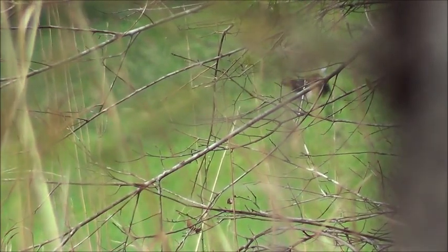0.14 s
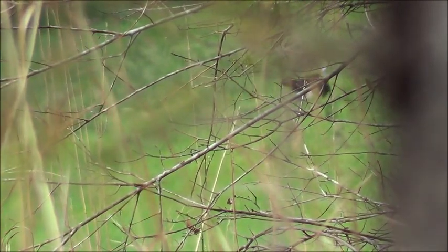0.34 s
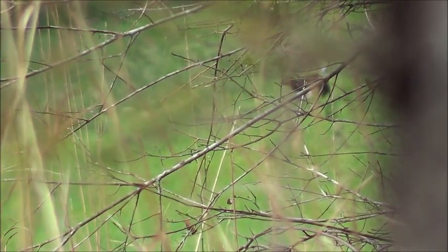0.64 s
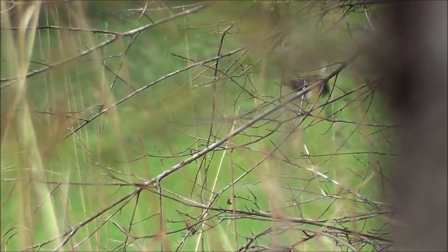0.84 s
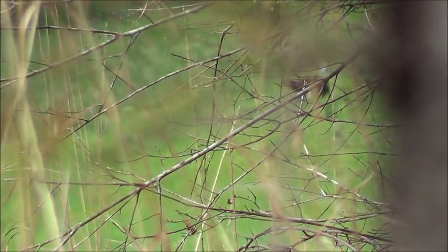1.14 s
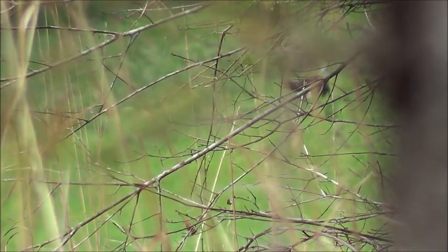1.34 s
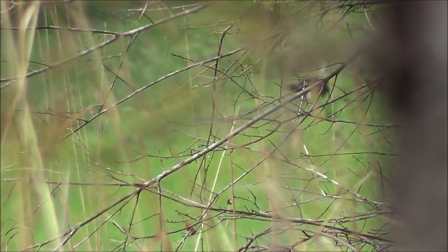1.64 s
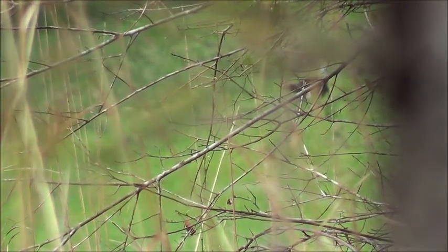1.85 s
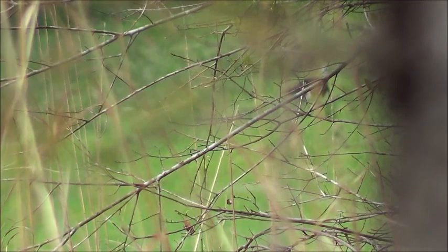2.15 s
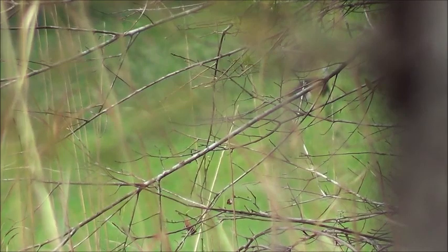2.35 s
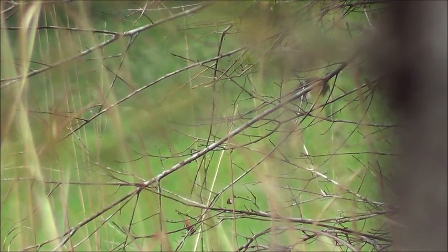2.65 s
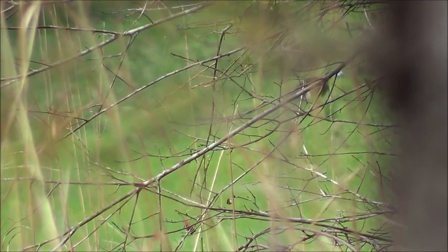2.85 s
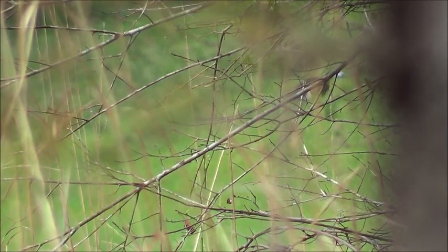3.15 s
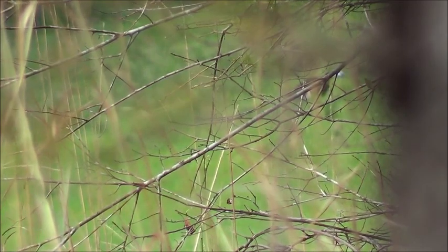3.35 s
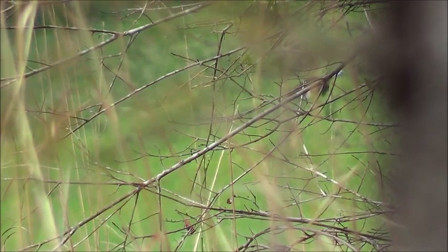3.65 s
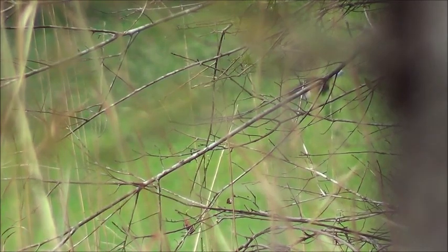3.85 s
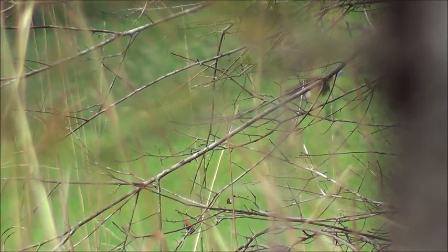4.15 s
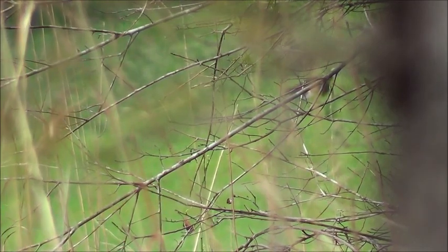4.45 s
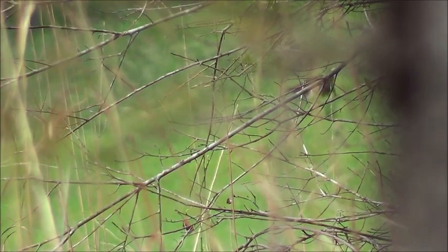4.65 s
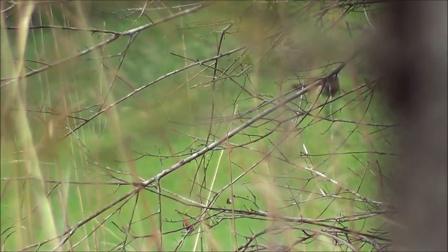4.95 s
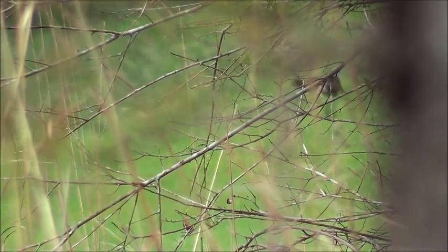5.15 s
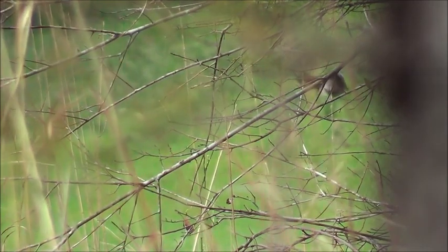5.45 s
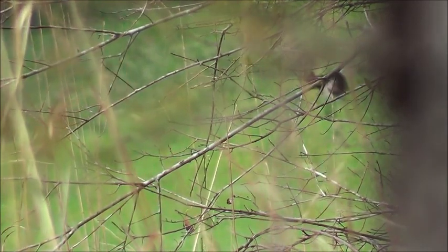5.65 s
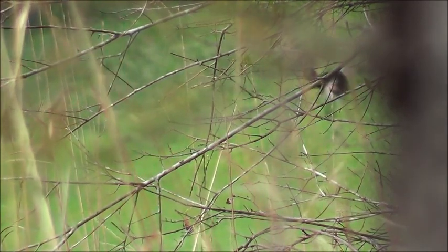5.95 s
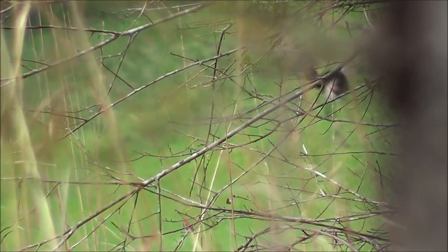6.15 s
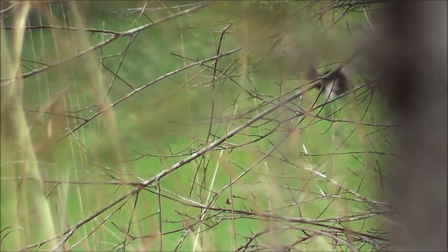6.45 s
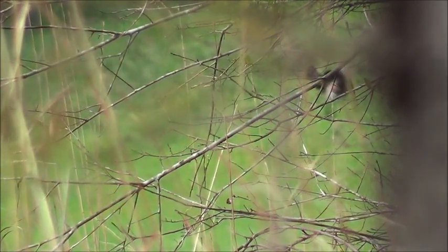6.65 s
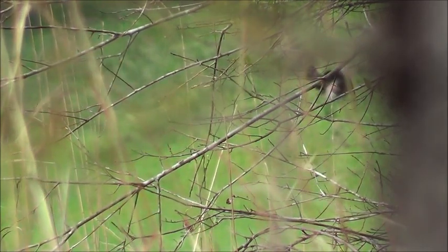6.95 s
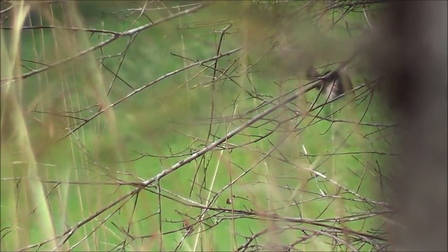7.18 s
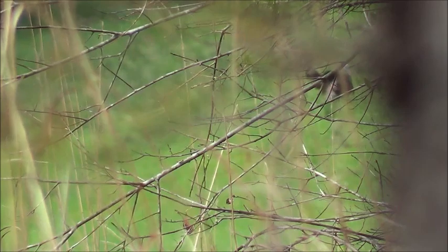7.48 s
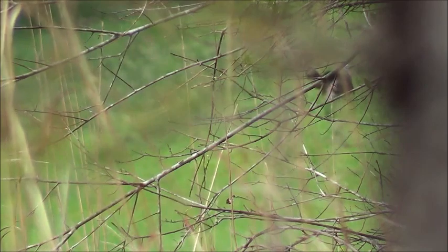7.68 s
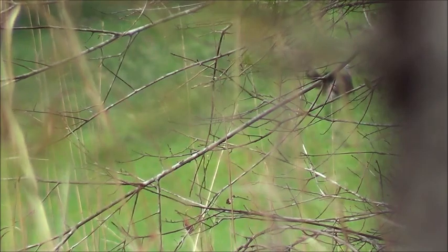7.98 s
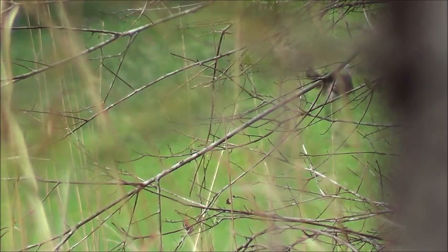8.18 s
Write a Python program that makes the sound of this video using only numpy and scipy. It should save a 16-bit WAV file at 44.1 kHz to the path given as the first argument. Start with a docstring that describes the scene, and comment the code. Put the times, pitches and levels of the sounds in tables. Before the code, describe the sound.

A turkey close by on the left gives nine loud raspy yelps, a short purr and five clucks in quiet woodland.

```python
"""Quiet woodland, a turkey close by and left of a camera's stereo microphone. Over air, hiss and scan whine
it opens with nine yelps, each a raspy reed tone that slides up as the membrane tightens and slips back,
many times over. Far trees answer faintly. From 3.5 s a few twigs tick; near 5 s comes a short purr, and
from 6 s five clucks. The camera's gain control ducks hiss and whine under each call and recovers slowly."""
import sys
import numpy as np
from scipy import signal
from scipy.fft import rfft, irfft, next_fast_len
from scipy.io import wavfile
from scipy.ndimage import uniform_filter1d, minimum_filter1d

SR = 44100
rng = np.random.default_rng(int(sys.argv[2]) if len(sys.argv) > 2 else 0)


def store_wav(level_fs):
    """Save 16-bit WAV to argv[1]."""
    pcm = np.round(np.clip(np.atleast_2d(level_fs), -1, 1) * 32767)
    wavfile.write(sys.argv[1], SR, pcm.T.astype(np.int16))


N = 366912


def amp(db):
    return 10 ** (np.asarray(db) / 20)


def unit_rms(x):
    return x / np.sqrt(np.mean(x ** 2) + 1e-20)


def curve(points, hz):
    """Read (Hz, value) points on a log frequency axis."""
    freqs, values = np.transpose(points)
    return np.interp(np.log(hz + 1), np.log(freqs + 1), values)


def filtered(x, response):
    """Pass x through a complex response of frequency."""
    size = next_fast_len(N + SR // 2)
    return irfft(rfft(x, size) * response(np.fft.rfftfreq(size, 1 / SR)), size)[..., :N]


def minimum_phase(points, hz):
    """Response through (Hz, dB) points whose resonances ring after their cause."""
    cepstrum = irfft(np.log(amp(curve(points, hz))))
    cepstrum[1:len(hz)] *= 2
    cepstrum[len(hz):] = 0
    return np.exp(rfft(cepstrum))


def resonances(rows, hz):
    """Response of (centre Hz, width Hz, dB) resonators, summed with alternating sign."""
    return sum((-1) ** k * amp(db) * 1j * hz * width / (centre ** 2 - hz ** 2 + 1j * hz * width)
               for k, (centre, width, db) in enumerate(rows))


def patchy_noise(depth_db):
    """Two noises sharing patches of random gain in time and frequency."""
    spectra = signal.stft(rng.standard_normal((2, N)), nperseg=512)[2]
    patches = uniform_filter1d(uniform_filter1d(rng.standard_normal(spectra.shape[1:]), 6, 0), 14, 1)
    return signal.istft(spectra * amp(depth_db * unit_rms(patches)), nperseg=512)[1][:, :N]


# Woodland air and camera hiss. Each row: frequency in Hz, relative density in dB.
AIR_SPECTRUM = [(15, -53), (25, -23), (131, -10.5), (172, -12.5), (318, -2.5), (354, -1), (475, -1.5),
                (729, -2), (879, -3), (1240, -7.5), (1670, -8), (2240, -8), (3090, -8), (5880, -11.5),
                (15000, -13.5)]
# The air across the microphone. Each row: frequency in Hz, left-right correlation.
AIR_CORRELATION = [(60, 0.7), (130, 0.77), (290, 0.5), (640, 0.62), (1410, 0.76), (3100, 0.22), (6820, 0.5),
                   (15000, 0.93)]


def air(level_db=-49, insect_hz=3120):
    """A steady rush all round the microphone, with a faint band of far insects."""
    def mid_side(hz):
        insects_db = 5.2 * np.exp(-((hz - insect_hz) / 90) ** 2)
        colour = amp(curve(AIR_SPECTRUM + [(15750, -8.5), (15830, -68)], hz) + insects_db)
        angle = np.arccos(np.clip(curve(AIR_CORRELATION, hz), -1, 1)) / 2
        return colour * [np.cos(angle), np.sin(angle)]
    mid, side = filtered(patchy_noise(depth_db=1.06), mid_side)
    return amp(level_db) * unit_rms(np.array([mid + side, mid - side]))


def scan_whine(line_hz=15734.27, beat_hz=13.0, field_hz=59.94):
    """The camera's own scan tone beats with a near neighbour and has sidebands at the field rate."""
    t = np.arange(N) / SR
    line = np.sin(2 * np.pi * line_hz * t)
    neighbour = amp(-5.5) * np.sin(2 * np.pi * (line_hz * t + beat_hz * (t - .037)))
    sidebands = sum(amp(-15.5 - 1.1 * k) * np.sin(2 * np.pi * (line_hz - k * field_hz) * t)
                    for k in range(1, 9))
    lower_tone = amp(-75.5) * np.sin(2 * np.pi * 7433 * t)
    return amp(-51) * (line - neighbour + sidebands) + lower_tone


# Twigs around the microphone. Each row: start in seconds, level in dB, pitch in Hz.
TWIG_TICKS = [(3.5148, -34, 8710), (4.8544, -45, 7100), (5.1517, -26.5, 4240), (5.7873, -35, 3930),
              (7.103, -38.5, 4020), (7.1721, -50, 3084)]


def twigs(t60_s=0.0074):
    """Dry ticks, each a quickly dying tone in broad noise."""
    out, t = np.zeros((2, N + SR)), np.arange(400) / SR
    for start, db, hz in TWIG_TICKS:
        click = np.sin(2 * np.pi * hz * t) + .7 * rng.standard_normal((2, len(t)))
        out[:, round(start * SR):][:, :len(t)] += click * amp(db - 60 * t / t60_s)
    return out[:, :N]


# Far trunks, then nearer trunks and brush. Each row: frequency in Hz, seconds to die away by 60 dB.
FAR_TREE_DECAY = [(300, .6), (700, 0.38), (1020, 3.1), (1400, 1.5), (2000, .7), (5000, 0.31)]
NEAR_BRUSH_DECAY = [(300, 0.16), (1000, 0.45), (5000, 0.04)]


def woodland_echo(voice, decays, delay_s):
    """Trunks scatter the voice back to the microphone; each frequency dies at its own speed."""
    hz, t, spectra = signal.stft(rng.standard_normal((2, 2 * SR)), SR, nperseg=256)
    tail = signal.istft(spectra * amp(-60 * t / curve(decays, hz)[:, None]), SR, nperseg=256)[1]
    delayed = np.pad(voice, (round(delay_s * SR), 0))
    return signal.fftconvolve(delayed[None], tail / np.linalg.norm(tail[0]), axes=1)[:, :N]


# The bird's bearing at the microphone. Each row: frequency in Hz, left over right in dB.
LEFT_LOUDER = [(100, 10), (700, 2), (1300, 3.5), (2400, 6), (4400, 0.5), (8000, 8), (15000, -6)]
# Each row: frequency in Hz, phase lead of the left port in radians.
LEFT_LEAD = [(100, 0.086), (500, 1), (1100, 0.86), (2500, 0.9), (4500, 1), (7000, .4), (9000, -1.3),
             (12000, -0.011)]


def direct_path(voice, gain_db=4.18):
    """Straight from the bird, the voice reaches the left port earlier and louder."""
    def port(hz, side):
        gain = amp(side * curve(LEFT_LOUDER, hz) / 2 + gain_db)
        return gain * np.exp(.5j * side * curve(LEFT_LEAD, hz))
    return filtered(voice, lambda hz: np.array([port(hz, 1), port(hz, -1)]))


FULL_CALL_S = 0.13  # shorter calls arch less in octave and rasp, and swell less


def effort_db(t, length, release, first_slip):
    """A call builds until its first slip, holds, then falls away."""
    onset = np.clip(1 - t / first_slip, 0, 1)
    ending = np.clip(1 - (length - t) / release, 0, 2)
    return -12.5 * onset ** 2 - 14.5 * ending ** 1.2


# Fixed beak resonances. Each row: centre in Hz, width in Hz, gain in dB.
BEAK_MODES = [(2439, 110, 2.5), (3400, 2300, -20), (5020, 280, -20.5), (8300, 1700, -30), (9335, 250, -12),
              (12600, 1200, -28.5)]
# The moving resonance, from beak shut to wide, in the same columns.
GAPE_MODES = [(3657, 480, -0.5), (3936, 480, -2.5), (4272, 460, -1), (4500, 310, -7.5)]


def beak(snaps, calls, arch_hz=600, tilt_hz=250):
    """Snaps ring the beak; one resonance climbs as it opens mid-call and comes part way back."""
    t, level_db, gape_hz = np.arange(N) / SR, np.full(N, -120.), np.zeros(N)
    for start, length, release, _, first_slip, *_, rasp_db, beak_hz in calls:
        on = (t >= start) & (t < start + length + .01)
        age = t[on] - start
        progress = age / length
        arch_db = min(length / FULL_CALL_S, 1) * np.interp(progress, [0, .38, 1], [-12.5, 0, -14])
        level_db[on] = rasp_db + arch_db + .8 * effort_db(age, length, release, first_slip)
        opening = np.sin(np.pi * np.minimum(progress, 1))
        centre_hz = beak_hz + tilt_hz * (progress - .5) + arch_hz * (opening - .6)
        gape_hz[on] = np.clip(centre_hz, GAPE_MODES[0][0], GAPE_MODES[-1][0])
    rasp = filtered(amp(level_db + 22.5) * snaps, lambda hz: 1 / (1 + (2000 / (hz + 1)) ** 8))
    out = filtered(rasp, lambda hz: resonances(BEAK_MODES, hz))
    for centre, width, db in GAPE_MODES:
        share = np.clip(1 - np.abs(gape_hz - centre) / 420, 0, 1)
        out += amp(db) * filtered(share * rasp, lambda hz: resonances([(centre, width, 0)], hz) ** 2)
    return out


def slip_times(length, first_slip, slide_s, slowing_s, slowest, jitter, slow_span_s=.03):
    """A call's start, the times its membrane slips back, and its end; slips thin out around `slowest`."""
    t = np.arange(round(length * SR)) / SR
    period = slide_s + slowing_s * np.exp(-((t - slowest * length) / slow_span_s) ** 2)
    count = np.cumsum(1 / period) / SR
    count -= np.interp(first_slip, t, count)
    times = np.interp(np.arange(np.ceil(count[-1])), count, t)
    return np.r_[0, np.clip(times + .0004 * jitter[:len(times)], 0, length), length]


def slide_pitch(t, span, low_hz, high_hz, opens_call, lock_s=.0065, jump_s=.001482, slackest=.75):
    """The tightening membrane climbs, jumps and locks on the top pitch. Returns Hz and lock, 0 to 1."""
    climb_s = max(span - lock_s, 0)
    climb = np.minimum(t / (climb_s + 1e-4), 1)
    locked = .5 + .5 * np.tanh((t - climb_s) / jump_s)
    slackening = 0
    if opens_call:  # a call starts taut and slackens before its first climb
        slackening = np.clip(1 - climb / slackest, 0, 1)
        climb = np.clip((climb - slackest) / (1 - slackest), 0, 1)
    rising_hz = low_hz * (1 + .2 * np.sin(np.pi / 2 * climb) + .3 * slackening)
    locked_hz = high_hz * (1 - .05 * (t - climb_s - lock_s / 2) / lock_s)  # overshoots, then sinks
    return rising_hz + (locked_hz - rising_hz) * locked, locked


def membrane_snaps(phase, noise, noise_share=.5):
    """The membrane shuts sharply once a cycle: part pulse, part puff of noise."""
    pulse = unit_rms(np.exp(40 * (np.cos(phase) - 1)))
    puff = unit_rms(np.exp(2 * np.cos(phase))) * noise
    return (1 - noise_share) * pulse + noise_share * puff


# Lowest resonances of throat and beak. Each row: frequency in Hz, gain in dB.
THROAT_RESPONSE = [(100, -43.5), (300, -23), (440, -19.5), (520, -19), (620, -8.5), (780, -8.5), (900, -8),
                   (985, -4), (1090, -1.5), (1250, 2.5), (1500, -5), (1700, -16), (1950, -19),
                   (2200, -30.5), (16000, -71.5)]
# Yelps, purr pulses and clucks, close on the left. Each row: start, length and release in seconds,
# relative level in dB, time to the first slip, slide length and its slowing in seconds, slowest point
# as a share of the call, slack and top pitch in Hz, relative octave and rasp in dB, beak resonance in Hz.
CALLS = [(-.022, 0.057, .014, 6.5, .02, .0155, 0.00069, .5, 656.9, 951.3, -10.5, -39.5, 3860),
         (0.242, .17, 0.019, 6, .0202, .0131, .0077, .56, 680, 976.3, -2.5, -33, 3950),
         (0.614, .168, 0.041, 6.5, .02, .0133, .012, .51, 700, 959, -1.5, -33.5, 3870),
         (1.006, .148, 0.016, 4, .0265, .0122, .028, .64, 690, 950, -1, -36.5, 3950),
         (1.443, .158, .06, 3, .0245, .0105, .009, .6, 650, 960, -7, -42, 3950),
         (1.828, .142, 0.012, 5, .0178, .0104, .0102, .52, 689.6, 920, -0.5, -36.5, 3910),
         (2.189, 0.15, 0.021, 4.5, .0205, .0109, .0117, .54, 698.7, 951, -3.5, -37, 3780),
         (2.563, .155, 0.028, 6.5, .0168, .0113, .0094, .49, 695.8, 977.9, -3.5, -34, 3900),
         (2.944, .153, .022, 5.5, .0204, .0123, .0103, .58, 715.3, 981.8, -1.5, -36, 3780),
         (4.829, .016, 0.0094, -31.5, .014, .014, .001, .5, 647.5, 815, -14.5, -74.5, 4500),
         (4.877, .04, 0.06, -23, .013, .013, 0.0014, .5, 700.5, 777.3, -11.5, -66, 4500),
         (4.922, .03, .01, -14.5, .022, .014, .001, .5, 650.8, 945.4, -13, -56.5, 4500),
         (4.957, .03, 0.011, 0.5, 0.017, .0133, 0.0015, 0.3, 672.8, 977.8, -21, -53.5, 4550),
         (5.006, .031, 0.02, 2, 0.015, .012, 0.00073, 0.9, 666, 945.6, -19, -57.5, 4550),
         (5.049, .034, .01, -0.5, .0181, 0.013, .001, .5, 642.8, 911, -13.5, -54, 4550),
         (5.094, .035, 0.015, 2, .0186, .014, 0.00049, 0.1, 633.8, 925.2, -10, -46.5, 4550),
         (5.143, .04, 0.025, 3.5, .0145, 0.0099, .001, 0.7, 652.2, 918.6, -8.5, -47.5, 4400),
         (5.192, .037, 0.02, 5, .018, .012, .001, 0.9, 636.7, 972.5, -24, -50.5, 4100),
         (6.14, .058, .01, 7, .0201, .015, .001, .5, 676.2, 1030, -10, -36.5, 4230),
         (6.26, .066, 0.021, 3, .0125, .012, 0.0023, .55, 724, 1127, -2.5, -44, 3780),
         (6.464, .088, 0.014, 5, .0136, .0136, .001, .5, 728, 1050, 0.5, -35.5, 4000),
         (6.736, .083, 0.017, 3, .0147, 0.012, 0.0011, .5, 747, 1134, -4.5, -36.5, 3942),
         (7.477, 0.056, 0.013, 6, .0174, 0.014, .001, 0.4, 671.4, 1067, -11, -41.5, 3800)]


def turkey(rise_s=.0018, fall_s=.0033, waver=.0094, flutter_db=2.58, breath_db=-14, slip_db=5.5):
    """Each slide sends a wavering tone and its octave through the throat, and snaps into the beak."""
    tone, snaps, preroll = np.zeros(N + SR), np.zeros(N + SR), SR // 10
    drift, flutter, breath, hiss = rng.standard_normal((4, N + SR))
    drift, flutter = [unit_rms(uniform_filter1d(noise, size=110)) for noise in (drift, flutter)]
    last_phase = 0
    for call in CALLS:
        start, length, release, db, first_slip, slide_s, slowing_s, slowest = call[:8]
        slack_hz, top_hz, octave_db = call[8:11]
        time_jitter, low_jitter, high_jitter, level_jitter = rng.standard_normal((4, 40))
        fullness = min(length / FULL_CALL_S, 1)
        top_sag = .08 * (length - .1) / (FULL_CALL_S - .1)  # calls under 0.1 s rise instead
        slips = slip_times(length, first_slip, slide_s, slowing_s, slowest, time_jitter)
        for k, (slip, span) in enumerate(zip(slips, np.diff(slips))):
            t = np.arange(round((span + fall_s) * SR)) / SR
            onset = preroll + round((start + slip) * SR)
            at = slice(onset, onset + len(t))
            progress = slip / length
            slow_dip = .05 * np.clip(span / slide_s - 1, 0, .8) * (k > 0)  # slow slides peak lower
            low_hz = slack_hz * (1 - .13 * progress + .02 * low_jitter[k])
            high_hz = top_hz * (1 - slow_dip - top_sag * (progress - .5) + .02 * high_jitter[k])
            hz, locked = slide_pitch(t, span, low_hz, high_hz, opens_call=k == 0)
            phase = last_phase + 2 * np.pi * np.cumsum(hz * (1 + waver * drift[at])) / SR
            last_phase = phase[round(span * SR) - 1]  # the membrane swings on through each slip

            edge = np.clip(np.minimum(t / rise_s, (span + fall_s - t) / (.73 * fall_s)), 0, 1)
            envelope = amp(flutter_db * flutter[at]) * np.sin(np.pi / 2 * edge)
            # purer and louder when locked; the octave is weaker at both ends of a call
            arch = np.sin(np.pi * np.minimum((slip + t) / length, 1))
            overtone_db = octave_db - 21.5 * locked ** 2 - 17.5 * fullness * (1 - arch)
            swell_db = 4.5 * fullness * (locked - 1)
            level_db = db + effort_db(slip + t, length, release, first_slip) + swell_db
            reed = np.sin(phase) + amp(overtone_db) * np.sin(2 * phase + 1) + amp(breath_db) * breath[at]
            tone[at] += amp(level_db + 1.3 * level_jitter[k]) * envelope * reed
            flare = amp(slip_db * (k > 0) * np.exp(-t / .004))  # the rasp flares at each slip
            snaps[at] += flare * envelope * membrane_snaps(phase, hiss[at])
    throat = filtered(tone[preroll:][:N], lambda hz: minimum_phase(THROAT_RESPONSE, hz))
    return throat + beak(snaps[preroll:][:N], CALLS)


def scene():
    """The woodland and the bird as they reach the microphone."""
    voice = turkey()
    far_trees = amp(-41) * woodland_echo(voice, FAR_TREE_DECAY, delay_s=.034)
    near_brush = amp(-27.5) * woodland_echo(voice, NEAR_BRUSH_DECAY, delay_s=.0053)
    return air() + scan_whine() + twigs() + far_trees + near_brush + direct_path(voice)


def gain_control(x, loud_db=-15, deepest_db=7, attack_db_per_s=25, hold_s=.39, release_db_per_s=4):
    """Loud sound pulls the camera's gain down; it holds, then creeps back."""
    block = 220
    peaks = np.abs(x).max(0)[:N // block * block].reshape(-1, block).max(1)
    loudness = 1 / (1 + (amp(loud_db) / (peaks + 1e-9)) ** 3)
    cut_db, quiet_s, cuts = deepest_db, 0, []
    for loud in loudness:
        quiet_s = quiet_s * (1 - loud) + block / SR
        recovery = release_db_per_s * np.clip(quiet_s / hold_s - .5, 0, 1)
        cut_db = np.clip(cut_db + (attack_db_per_s * loud - recovery) * block / SR, 0, deepest_db)
        cuts.append(cut_db)
    return x * amp(-np.interp(np.arange(N), (np.arange(len(cuts)) + .5) * block, cuts))


def limiter(x, hold_s=.007, smooth_s=.0023):
    """A quick gain on both channels keeps peaks near full scale."""
    needed = np.minimum(1, 1 / (np.abs(x).max(0) + 1e-9))
    held = minimum_filter1d(needed, round(hold_s * SR))
    return x * uniform_filter1d(held, round(smooth_s * SR))


def record(dry, low_hz=30, top_hz=16000):
    """Inside the camera: slow and quick gain control, band limit, clipping at full scale."""
    x = limiter(gain_control(dry))
    x = x + .018 * x[::-1] ** 2  # a faint low thud leaks across with each peak
    return np.clip(filtered(x, lambda hz: (hz < top_hz) * hz ** 2 / (hz ** 2 + low_hz ** 2)), -1, 1)


dry = scene()
out = record(dry)
store_wav(out)
```